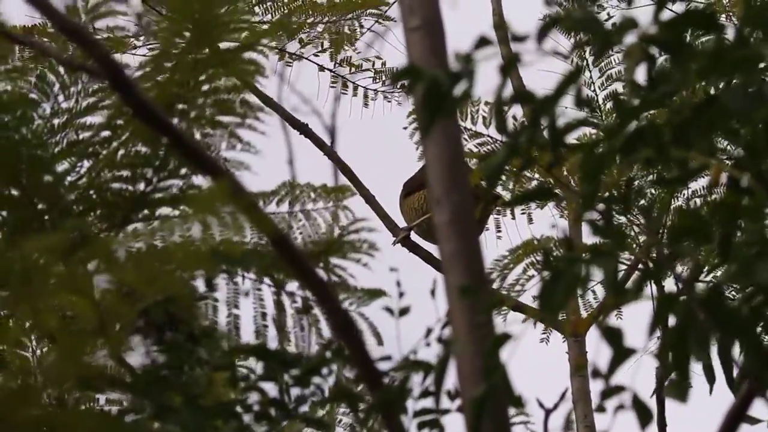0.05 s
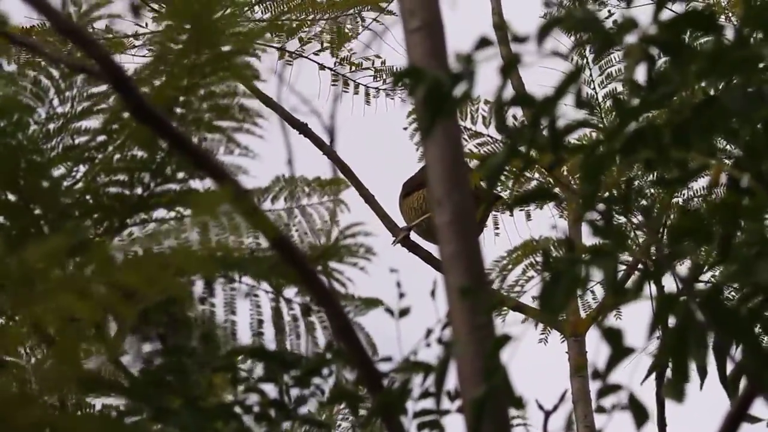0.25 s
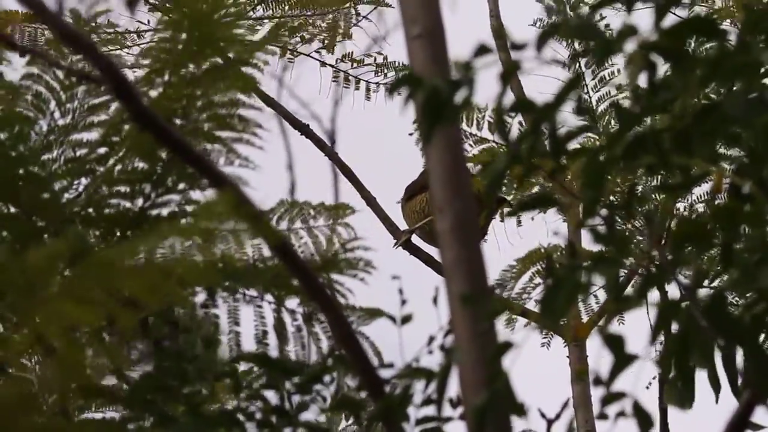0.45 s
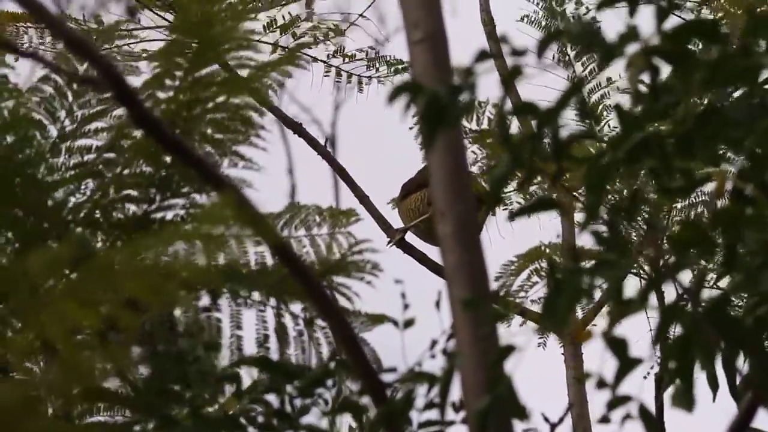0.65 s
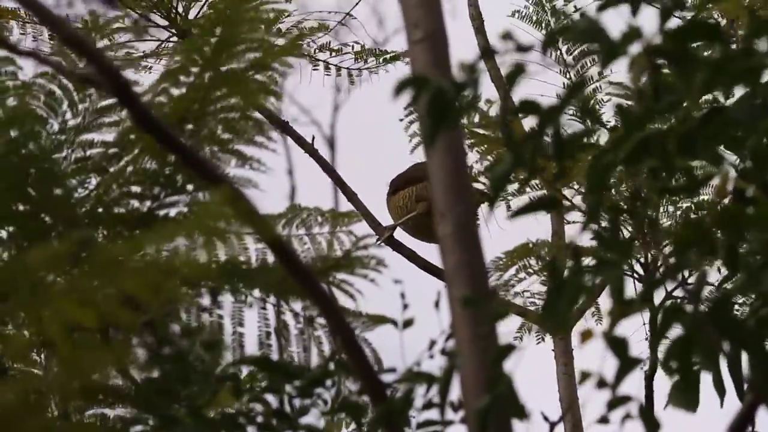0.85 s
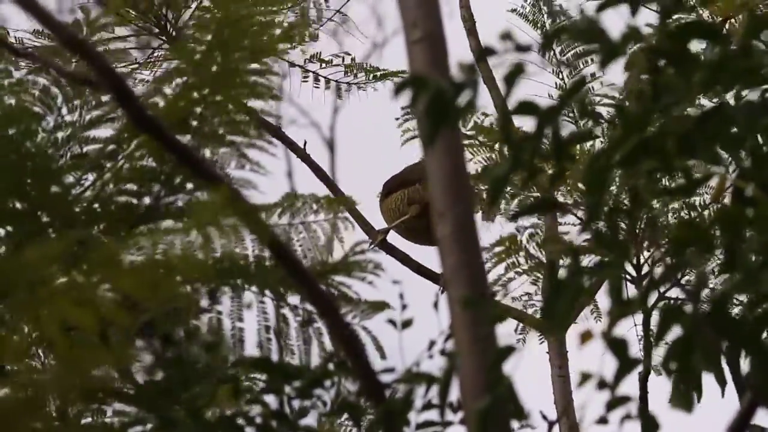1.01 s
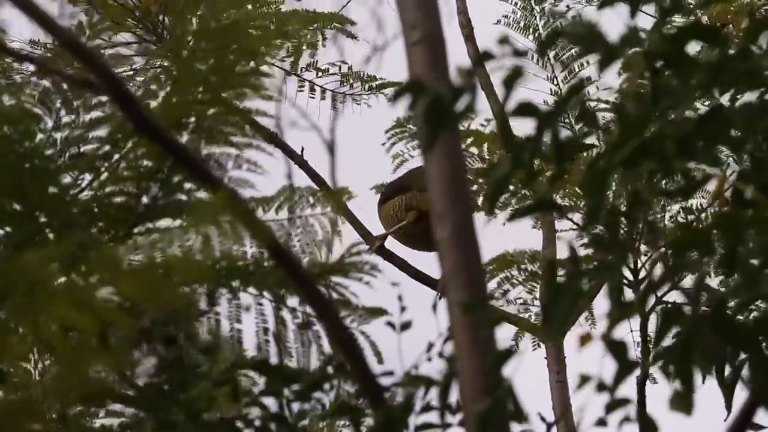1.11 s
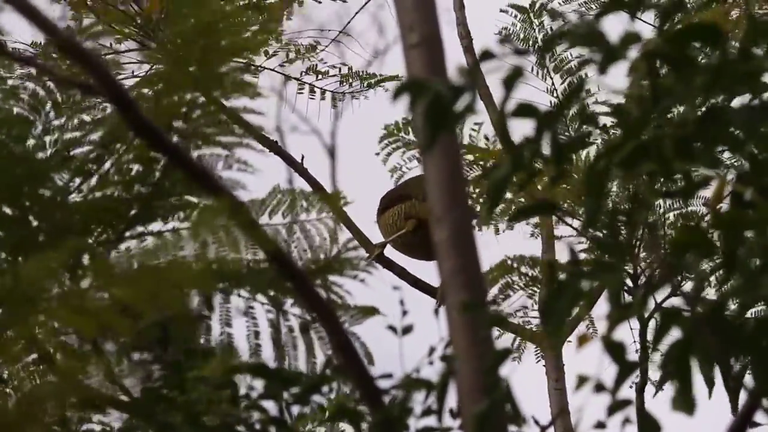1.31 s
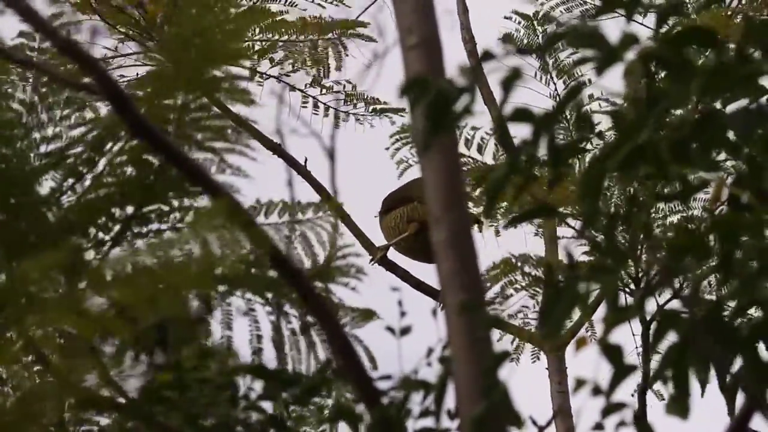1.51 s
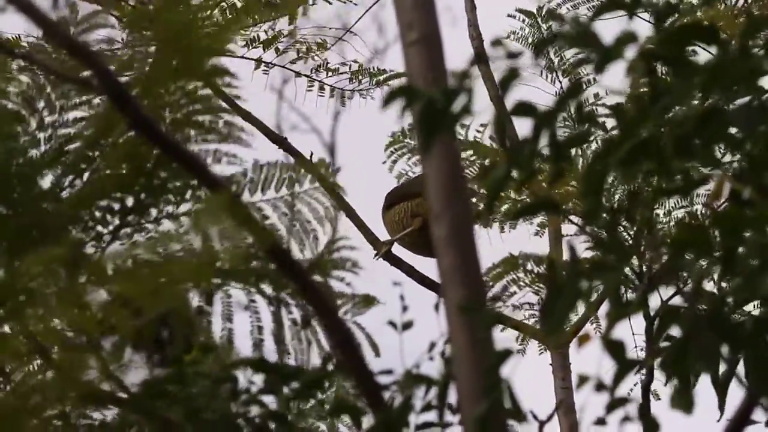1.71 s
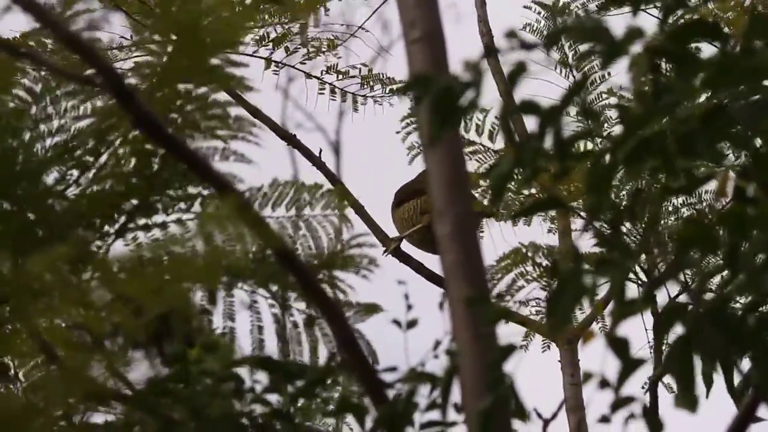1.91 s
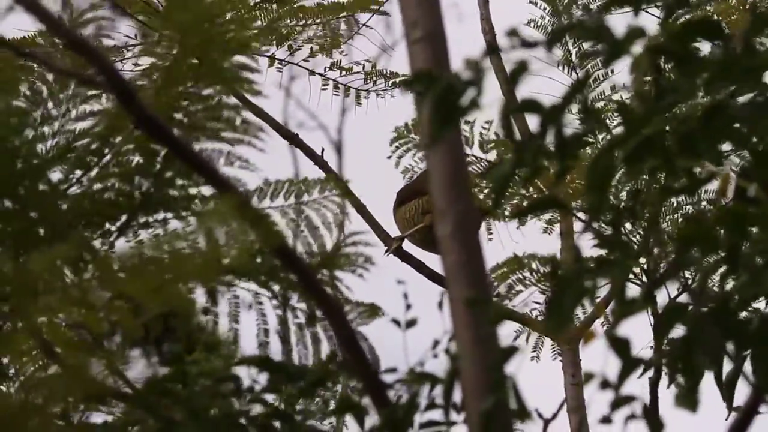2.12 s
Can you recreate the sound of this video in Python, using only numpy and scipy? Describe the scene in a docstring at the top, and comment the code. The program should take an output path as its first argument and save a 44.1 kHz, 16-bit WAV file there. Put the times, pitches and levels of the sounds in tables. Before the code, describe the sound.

A bird gives a long, wavering, slightly hoarse whistle, then a short dry rasp and a few quick rising notes. Its calls echo lightly among the trees over a faint steady hiss.

```python
"""A bowerbird on a woodland branch gives a long, wavering, slightly hoarse whistle that flips up and back.
Its syrinx makes the trembling tone and a second voice above it, while air rushes through the throat.
A short dry rasp follows, puffs of air ringing the throat. Short rising notes come before and after.
Near branches and far trees scatter every call, over a faint steady hiss."""
import sys
import numpy as np
from scipy import signal
from scipy.fft import rfft, irfft, next_fast_len
from scipy.io import wavfile
from scipy.ndimage import map_coordinates

SR = 44100
rng = np.random.default_rng(int(sys.argv[2]) if len(sys.argv) > 2 else 0)


def inscribe(sig):
    """Save sig as 16-bit PCM at rate SR to the path in sys.argv[1].

    A 1-D sig is mono; a 2-D sig holds one channel per row.
    Samples are clipped to [-1, 1] before scaling.
    """
    pcm = np.round(np.clip(np.atleast_2d(sig).T, -1, 1) * 32767)
    wavfile.write(sys.argv[1], SR, pcm.astype(np.int16))


N = 94815
T = np.arange(N) / SR


def amp(db):
    """Decibels to gain."""
    return 10 ** (np.asarray(db) / 20)


def along(points, hz):
    """Read a curve of (hz, value) points on a log frequency axis."""
    freqs, values = np.transpose(points)
    return np.interp(np.log(hz + 1), np.log(freqs + 1), values)


def contour(rows):
    """Glide through the second column, with time in the first."""
    return np.interp(T, *np.transpose(rows)[:2])


def fader(rows):
    """Gain over time from the last column in dB, silent outside the rows."""
    rows = np.array(rows)
    return amp(np.interp(T, rows[:, 0], rows[:, -1], left=-120, right=-120))


def wobble(rate_hz):
    """A smooth random curve with rate_hz knots a second."""
    return map_coordinates(rng.standard_normal(N), [T * rate_hz])


def filtered(x, response):
    """Equalise x with a gain that depends on frequency."""
    size = next_fast_len(N + SR // 2)
    return irfft(rfft(x, size) * response(np.fft.rfftfreq(size, 1 / SR)), size)[..., :N]


def noise(colour):
    """Coloured noise of rms 1."""
    x = filtered(rng.standard_normal(N), lambda hz: amp(along(colour, hz)))
    return x / np.sqrt(np.mean(x ** 2) + 1e-20)


def ring(colour, size=2048):
    """Minimum-phase impulse response with the given colour and unit energy."""
    cepstrum = irfft(np.log(amp(along(colour, np.fft.rfftfreq(size, 1 / SR)))))
    cepstrum[1:size // 2] *= 2
    cepstrum[size // 2 + 1:] = 0
    impulse = irfft(np.exp(rfft(cepstrum)))
    return impulse / np.linalg.norm(impulse)


def stereo(mid, side, width):
    """Left and right from a mid signal and an unrelated side signal, turned down by the width curve."""
    side = filtered(side, lambda hz: amp(along(width, hz)))
    return np.array([mid + side, mid - side])


def hiss(level_db=-43, side_boost_db=2.5):
    """A faint steady background hiss, nearly the same in both ears."""
    # tone of the hiss: freq_hz, gain_db
    colour = [(15, -63), (25, -23), (75, -9), (216, -3), (306, -5), (341, -3), (370, -7), (554, -6.5),
              (669, -7.5), (1180, -7.5), (1760, -15), (12300, -28), (15600, -39.5)]
    # its stereo spread: freq_hz, side_gain_db
    width = [(60, -35), (130, -30), (290, -27), (640, -28), (1410, -27.5), (3100, -21.5), (6820, -16),
             (15000, -17.5)]
    drift_db = .28 * wobble(4.98)
    return amp(level_db + drift_db) * stereo(noise(colour), amp(side_boost_db) * noise(colour), width)


def scatter(x, decay, delay_s):
    """Echoes off trunks and leaves: a noise tail that dies along the (freq_hz, t60_s) decay curve."""
    # stereo spread of the echoes: freq_hz, side_gain_db
    width = [(1500, -40), (3000, -36), (6000, -26), (12000, -22)]
    hz, t, spectrum = signal.stft(rng.standard_normal((2, SR)), SR, nperseg=256)
    fade = amp(-60 * t / along(decay, hz)[:, None])
    _, tail = signal.istft(spectrum * fade, SR, nperseg=256)
    tail /= np.linalg.norm(tail[0])
    delayed = np.interp(T - delay_s, T, x, left=0)
    mid, side = signal.fftconvolve(delayed[None], tail, axes=1)[:, :N]
    return stereo(mid, side, width)


def far_trees(x, crossfade_s=.18):
    """Far echoes crossfade between fresh random tails, so the reverb stays smooth and does not ring."""
    # reverb time of the wood: freq_hz, t60_s
    decay = [(300, 0.2), (1500, .55), (3000, 0.49), (6000, 0.38), (12000, 0.21)]
    centres_s = np.arange(0, T[-1] + crossfade_s, crossfade_s)
    fades = [np.cos(np.pi / 2 * np.clip((T - s) / crossfade_s, -1, 1)) for s in centres_s]
    return sum(scatter(x * fade, decay, delay_s=.015) for fade in fades)


def syrinx(hz, jitter, tremble_hz, shimmer_db, overtones=()):
    """The bird's voice: a tone and any overtones, trembling in pitch (jitter) and level (shimmer)."""
    phase = 2 * np.pi * np.cumsum(hz * (1 + jitter * wobble(tremble_hz))) / SR
    tone = np.sin(phase) + sum(amp(db) * np.sin(k * phase) for k, db in overtones)
    return np.sqrt(2) * tone * amp(shimmer_db * wobble(tremble_hz))


def hoarse(depth, flutter_hz=1100):
    """Fast random flutter of level that spreads a tone into sidebands."""
    return 1 + depth * wobble(flutter_hz)


def squeak(span_s=(1.85, 1.888), glide_hz=(13400, 14000), level_db=-53):
    """A thin rising tone far above one of the late notes."""
    swell = np.sin(np.pi * np.interp(T, span_s, [0, 1]))
    tone = syrinx(np.interp(T, span_s, glide_hz), jitter=.01, tremble_hz=900, shimmer_db=2.5)
    return amp(level_db) * swell * tone


def notes(swell_share=.58, release_s=.012, flick_attack_s=.0041, flick_decay_s=.004, air_db=-7.5):
    """Short breathy notes glide upward; each swells in, or opens at once with a flick of pitch."""
    # the calls: start_s, length_s, from_hz, to_hz, glide_s, flick_hz, roughness (0-1), level_db,
    # harmonic2_db, harmonic3_db, harmonic4_db
    calls = [(0, .064, 1480, 2500, .04, 0, .42, -46.5, -1, -15, -30),
             (.628, .056, 2720, 2745, .01, 1, .1, -41.5, -28, -28, -32),
             (.643, .046, 2620, 3014, 0.0248, 0, .25, -49, -1, 0, -11),
             (1.61, 0.0916, 2450, 3230, 0.041, 0, .28, -34, -22, -40, -38),
             (1.728, 0.076, 1500, 3280, .014, 0, .25, -29, -22, -39, -39),
             (1.85, .043, 1640, 2130, .017, 1250, .17, -44, 2, -9, -22),
             (2.125, .06, 1956, 2400, .03, 0, .3, -42, -7, -19, -25.5)]
    # tone of their breath: freq_hz, gain_db
    air_colour = [(900, -22), (1850, 3), (2200, -15), (2850, 1), (3500, -10), (4500, -12), (6400, -6),
                  (8000, -24), (15000, -28)]
    out = np.zeros(N)
    for start_s, length_s, from_hz, to_hz, glide_s, flick_hz, rough, level_db, *harmonics in calls:
        t = np.maximum(T - start_s, 0)
        glide = to_hz + (from_hz - to_hz) * np.exp(-t / glide_s)
        hz = glide + flick_hz * np.exp(-t / flick_decay_s)
        attack_s = flick_attack_s if flick_hz > 0 else swell_share * length_s
        envelope = np.clip(t / attack_s, 0, 1) * np.clip((length_s - t) / release_s, 0, 1)
        tone = syrinx(hz, .06 * rough, tremble_hz=500, shimmer_db=1.34, overtones=enumerate(harmonics, 2))
        air = rough * amp(air_db) * noise(air_colour)
        out += amp(level_db) * envelope * (tone * hoarse(rough) + air)
    return out


def rasp(rate_hz=146, count=50, jitter_s=.0005, spread_db=2, decay_s=.0017, air_db=-9, trim_db=-2.5):
    """A dry rattle: uneven puffs of air, each dying at once, ring the throat."""
    # swell of the rasp before the trim: time_s, level_db
    swell = [(.94, -56), (.99, -53), (1.035, -47), (1.065, -35.5), (1.1, -38.5), (1.12, -34),
             (1.135, -44.5), (1.18, -48)]
    # throat resonances: freq_hz, gain_db
    throat = [(250, -30), (700, -7.5), (1100, -2.5), (1600, 0), (2200, -5.5), (2900, -17), (4000, -17),
              (4900, -25), (5900, -16.5), (7000, -33), (8600, -22.5), (10500, -17.5), (12300, -25),
              (14000, -39)]
    times_s = swell[0][0] + np.arange(count) / rate_hz + jitter_s * rng.standard_normal(count)
    strengths = amp(spread_db * rng.standard_normal(count))
    pulses = np.bincount((times_s * SR).astype(int), strengths, N)[:N]
    gate = signal.lfilter([1], [1, -np.exp(-1 / (decay_s * SR))], pulses)
    gate *= np.sqrt(2 / (decay_s * rate_hz))  # near unit power while puffing
    puffs = (gate + amp(air_db)) * rng.standard_normal(N)
    return signal.fftconvolve(puffs, ring(throat))[:N] * fader(swell) * amp(trim_db)


def breath():
    """Air rushes through the throat, with a scratchy catch as the whistle takes hold and sizzle on top."""
    # envelopes of the three noises: time_s, level_db
    rush = [(.14, -60), (.22, -46), (.275, -47.5), (.32, -48), (.47, -58), (.54, -46), (.61, -43),
            (.68, -46), (.73, -42.5), (.82, -60), (.92, -70)]
    sizzle = [(.58, -78), (.66, -51), (.72, -49.5), (.79, -59.5), (.9, -65)]
    catch = [(.232, -66), (.252, -49), (.285, -48), (.335, -62)]
    # their tone colours: freq_hz, gain_db
    throat = [(300, -26), (800, -19), (1500, 6.5), (2000, -4), (2380, -5), (2600, -6), (3250, -5),
              (3780, -7), (4200, -15), (5900, -9), (7200, -34), (15000, -24)]
    sizzle_colour = [(4000, -37), (7500, -14), (8600, -1.5), (11000, 1.5), (12500, -14), (15500, -10)]
    catch_colour = [(600, -18), (1700, 1), (2050, -8), (2380, 4), (2750, -10), (3200, 1), (3800, -10),
                    (6000, -9), (9000, -10), (15000, -9)]
    layers = [(throat, rush), (sizzle_colour, sizzle), (catch_colour, catch)]
    return sum(noise(colour) * fader(envelope) for colour, envelope in layers)


def second_voice():
    """The syrinx adds a hoarse second tone above the middle of the whistle."""
    # the upper line: time_s, pitch_hz, level_db
    melody = [(.485, 2750, -56), (.505, 2550, -47.5), (.525, 2500, -54), (.545, 2920, -44),
              (.565, 2650, -50), (.59, 3150, -44), (0.606, 3450, -43), (0.636, 3372, -43), (.68, 3550, -52)]
    tone = syrinx(contour(melody), jitter=.055, tremble_hz=700, shimmer_db=1.5)
    return tone * hoarse(depth=.6) * fader(melody)


def whistle():
    """The long wavering tone of the syrinx starts rough, clears, and flips up and back."""
    # the lead line: time_s, pitch_hz, level_db
    melody = [(.13, 847.5, -54), (.2, 1270, -42), (.215, 1483, -43), (.245, 1031, -39.5), (.268, 900, -42),
              (.283, 1308, -32), (.3, 1306, -37.5), (.325, 1069, -32), (.352, 1221, -30), (.362, 1679, -29),
              (.378, 1462, -28), (.4, 1592, -29.5), (.412, 1471, -24), (.448, 1680, -31.5),
              (.472, 1619, -26.5), (.488, 1719, -42), (.505, 1558, -43), (.535, 1171, -33.5),
              (.562, 1071, -32.5), (.59, 1309, -28.5), (.603, 1340, -28), (.638, 1623, -22),
              (.646, 1848, -33), (.654, 2738, -41), (.668, 2850, -53), (.681, 2401, -37.5),
              (.69, 2047, -31), (.697, 1605, -23), (.72, 1568, -26.5), (.745, 1620, -35),
              (.783, 1610, -32.5), (.805, 1086, -31), (.835, 1203, -42.5), (.89, 1152, -52)]
    # its weak overtones: harmonic_number, gain_db
    overtones = [(2, -30), (3, -37)]
    # grit in the voice: time_s, roughness (0-1)
    hoarseness = [(.2, .55), (.28, .16), (.34, .07), (.47, .03), (.53, .08), (.63, .04), (.67, .25),
                  (.697, .04), (.8, .14)]
    rough = contour(hoarseness)
    jitter = .008 + .09 * rough
    tone = syrinx(contour(melody), jitter, tremble_hz=220, shimmer_db=1.4, overtones=overtones)
    return tone * hoarse(rough) * fader(melody)


def scene(near_db=-11, far_db=-8.5):
    """The bird, its echoes from near branches and far trees, and the hiss."""
    bird = whistle() + second_voice() + breath() + notes() + squeak() + rasp()
    near_branches = scatter(bird, decay=[(1000, .07)], delay_s=.003)
    return bird + amp(near_db) * near_branches + amp(far_db) * far_trees(bird) + hiss()


def record(dry, cutoff_hz=15780):
    """A brick-wall low-pass takes off the very top of the treble."""
    return filtered(dry, lambda hz: hz < cutoff_hz)


dry = scene()
out = record(dry)
inscribe(out)
```